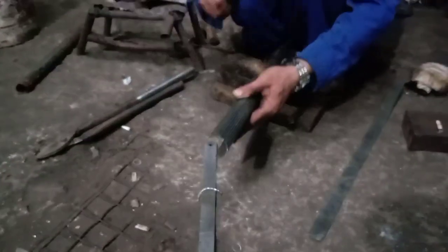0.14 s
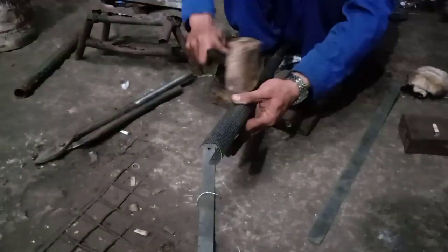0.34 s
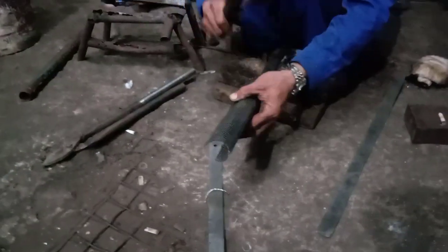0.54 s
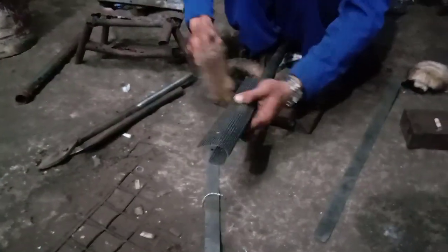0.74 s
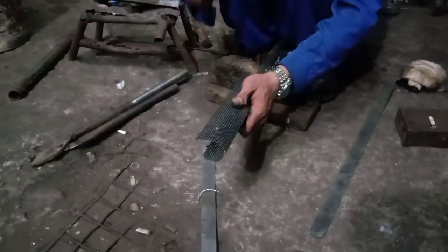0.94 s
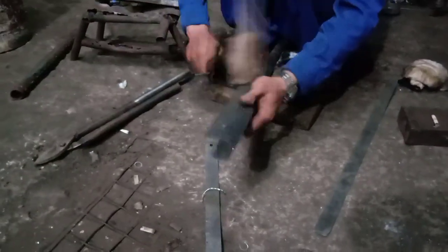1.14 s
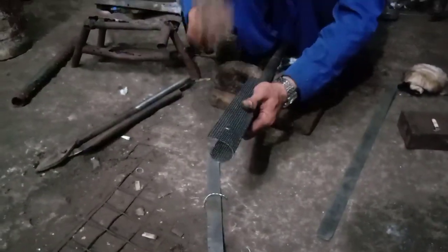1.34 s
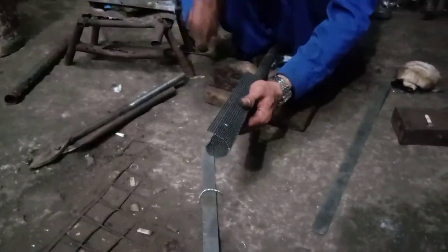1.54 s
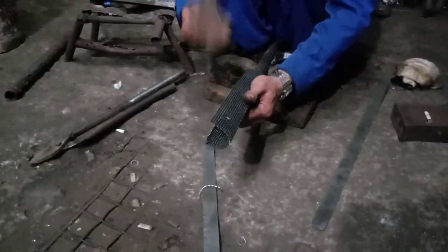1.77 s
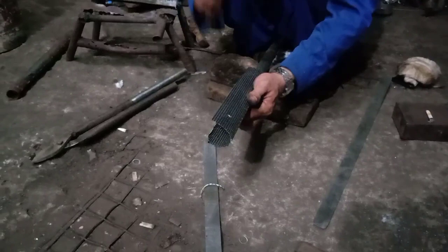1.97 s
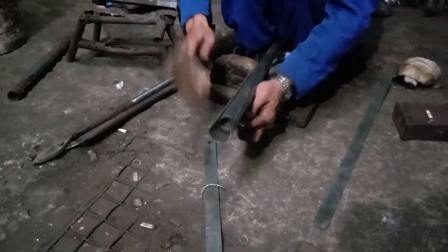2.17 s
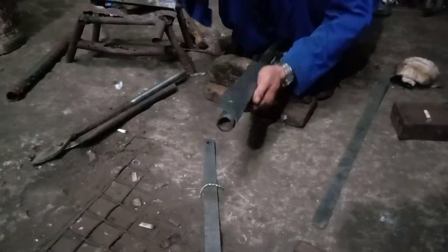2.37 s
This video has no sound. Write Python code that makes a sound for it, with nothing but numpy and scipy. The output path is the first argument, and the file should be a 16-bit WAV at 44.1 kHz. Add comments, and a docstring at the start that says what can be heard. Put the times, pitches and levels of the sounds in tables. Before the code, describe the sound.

Five loud hammer blows on a perforated steel tube resting on a block, each a hard clanking knock with rattle and brief ring; light scuffs between, low hum and hiss, small workshop, close microphones.

```python
"""Hum and hiss fill a small workshop; the sleeve swishes and a perforated steel tube scuffs on a block.
From 0.2 s a hand hammer pounds the tube five times: damped modes knock and thud, noise cracks and rattles.
After each blow the tube's modes ring, with two faint high tones, until the hand damps it; the block rocks back.
Between blows the tube is turned, with noise scuffs and decaying bumps; the last scuffs follow the fifth blow.
A limiter ducks the background around loud peaks."""
import sys
import numpy as np
from scipy import signal
from scipy.io import wavfile
from scipy.ndimage import uniform_filter1d, minimum_filter1d

SR = 44100
rng = np.random.default_rng(int(sys.argv[2]) if len(sys.argv) > 2 else 0)


def persist_wave(psi):
    """Save psi, clipped to +-1, as 16-bit WAV."""
    counts = np.round(np.clip(psi, -1, 1) * 32767).astype(np.int16)
    wavfile.write(sys.argv[1], SR, np.atleast_2d(counts).T)


N = 105840
TIME = np.arange(N) / SR
AFTER = TIME[:SR // 2]  # seconds since the start of one event

# Noise bands: third-octave edges in Hz, then pairs of band centre in Hz and its filter.
EDGES_HZ = 28 * 2 ** (np.arange(29) / 3)
BANDS = [(np.sqrt(low * high), signal.butter(2, [low, high], "band", fs=SR, output="sos"))
         for low, high in zip(EDGES_HZ, EDGES_HZ[1:])]
# Left-right correlation of diffuse sound. Each row: frequency in Hz, correlation from 0 to 1.
LIKENESS = [(80, 0.96), (300, 0.85), (700, 0.49), (1300, 0), (2200, 0), (15000, 0)]

# Echo spectrum of the room. Each row: frequency in Hz, relative level in dB.
ROOM = [(70, -6), (170, -0.5), (400, 1.5), (850, -7.5), (1600, -1.5), (2400, -3.5), (5000, -4.5),
        (13000, 1.5)]
# Reverberation of the room. Each row: frequency in Hz, time to fall 60 dB in seconds.
ROOM_T60 = [(80, 0.47), (600, 0.24), (2000, 0.21), (6000, 0.77), (14000, 0.21)]
ROOM_BUILD_S, ROOM_PAN_DB = 0.0015, -0.5  # pan is added on the left, taken off on the right
KNOCK_ROOM_DB, CRACK_ROOM_DB = -2, -1.5

# Low workshop noise. Each row: frequency in Hz, spectral density in dB against unit white noise.
HUM = [(30, -86), (55, -39), (90, -28.5), (150, -37.5), (300, -33), (700, -30.5), (1200, -36.5),
       (2100, -27), (3300, -43.5), (6000, -75)]
# Hiss spectrum, before its level curve. Each row: frequency in Hz, relative density in dB.
HISS = [(1500, 0), (3000, 5.5), (4200, -13), (5400, 12), (6500, -7.5), (7800, -8.5), (10000, -28.5),
        (12000, -12), (15000, -6)]
# Course of the hiss. Each row: time in seconds, level in dB.
HISS_LEVEL = [(0, -31.5), (.2, -31), (.38, -32.5), (.7, -40), (1.0, -36.5), (1.25, -40), (1.45, -38),
              (1.65, -41), (1.92, -33.5), (2.15, -36.5), (2.4, -35)]
HISS_PAN_DB, FLICKER_DB = -1.06, 2.5  # pan is added on the left, taken off on the right

# Swishes of sleeve and sliding tube. Each row: start in seconds, length in seconds, centre in Hz, level in dB.
SWISHES = [(0.0, 0.034, 4980, -36.5), (0.313, 0.17, 5970, -42.5), (0.481, 0.06, 5280, -38.5),
           (0.528, 0.041, 6000, -36), (1.384, 0.12, 5780, -41), (1.857, 0.099, 5800, -39),
           (2.322, 0.044, 5740, -37)]
SWISH_WIDTH_HZ = 410

# Scuffs of the turned tube on the block. Each row: start in seconds, length in seconds, level in dB.
SCUFFS = [(0.087, 0.058, -33), (0.27, 0.13, -42.5), (0.484, 0.058, -37.5), (1.373, 0.094, -36.5),
          (1.735, 0.073, -37), (1.863, 0.069, -43), (2.226, 0.079, -39), (2.323, 0.052, -29.5),
          (2.362, 0.046, -33)]
# Spectrum shared by the scuffs. Each row: frequency in Hz, relative density in dB.
SCUFF = [(150, -51), (700, 10.5), (1200, -2), (2200, 12.5), (3200, 1.5), (4200, 2), (5600, 4.5),
         (7500, -21), (10000, -8.5), (14000, -21)]
# Light bumps of tube and block.
# Each row: start in seconds, frequency in Hz, level in dB, 60 dB decay in seconds.
BUMPS = [(.10, 3610, -26, 0.082), (.115, 2215, -31, 0.16), (0.488, 251, -31.5, 0.24),
         (0.908, 106.4, -38.5, 0.13), (1.045, 3570, -34, 0.092), (1.404, 295.5, -34, 0.27),
         (1.859, 94, -38, 0.14), (2.018, 5260, -21.5, 0.077), (2.337, 260, -29.5, 0.13)]
BUMP_BUILD_S = 0.004

# Rings of the tube at the blows, and twice more where it springs back onto the block.
# Each row: start in seconds, then main, middle, upper and shimmer drive in dB,
# ring length as a factor, time until gripped in seconds.
RINGS = [(0.2107, 3, -4, 4, -4, 0.86, 0.084), (0.5679, -9.5, -16, -19, 1, 0.93, 0.09),
         (1.0708, -6.5, -1, -0.5, 1.5, 0.88, 0.18), (1.107, -7, -12, -5.5, -11, 1.46, 0.072),
         (1.5074, -15, -21, -23, -11.5, 1.9, 0.075), (1.9709, -1, -12.5, -21, -7.5, 2.04, 0.042),
         (0.305, -16.5, -27, -23, -13, 0.91, 0.044)]
# Ringing modes of the tube up to 6.9 kHz, partly in close pairs,
# with two faint, brief high tones at 10.3 and 11 kHz.
# Each row: frequency in Hz, relative level in dB, 60 dB decay in seconds before the length factor.
RING_TONES = [(2189, -10.5, 0.19), (2214, -25, 0.75), (3027, -19, 0.21), (3086, -20, 0.094),
              (3808, -23.5, 0.12), (3850, -21, 0.14), (5020, -30, 0.16), (5825, -30.5, 0.093),
              (5845, -32, 0.15), (6870, -45.5, 0.14), (10300, -39, 0.13), (11000, -41, 0.16)]
MIDDLE_FROM_HZ, UPPER_FROM_HZ, SHIMMER_FROM_HZ = 2600, 3400, 4400
RING_BUILD_S, RING_HOLD_S = 0.0023, 0.019  # the hold is stretched by the length factor
RING_WAVER, WAVERS_PER_S = .33, 15
RING_BUZZ, BUZZES_PER_S = .2, 290
RING_LAG_CYCLES = 0.26  # between the two microphones
GRIP_T60_S = 0.19  # extra damping once the hand closes

# Hammer blows. Each row: start in seconds, then low knock, high knock, clank, thud, crack and rattle in dB,
# rattle length as a factor, sizzle in dB, rocking of the block in dB.
BLOWS = [(0.2107, -1.5, 7, 4, -4, 3.5, -2.5, 1.1, -2, -29),
         (0.5679, 1, -0.5, 2, 4, -0.5, 4, 0.77, -1.5, -39),
         (1.0708, -1.5, 2, 3, -1.5, -1, -3, 1.63, -17, -30),
         (1.507, -1, 1, -7.5, -2.5, 0, 1, 1.08, -11, -27),
         (1.9704, -7, 1, -9, -1.5, -2.5, 0.5, 1.15, -1, -21)]
# Dead modes of the tube pinned under the hammer, low then high.
# Each row: frequency in Hz, relative level in dB, 60 dB decay in seconds.
LOW_KNOCK = [(655, -10.5, 0.035), (698, -8, 0.036), (750, -8.5, 0.03), (893.4, -3.5, 0.028),
             (1260, -15.5, 0.034)]
HIGH_KNOCK = [(1506, -27, 0.037), (1589, -7.5, 0.033), (1675, -7, 0.025)]
# Short modes of the clank. Each row: frequency in Hz, relative level in dB, 60 dB decay in seconds.
CLANK = [(1868, -11.5, 0.047), (1932, -7.5, 0.027), (2090, -20, 0.032), (2233, -10, 0.03),
         (2334, -22, 0.07), (2604, -17.5, 0.044), (3040, -22, 0.037)]
# Modes of the block on the floor. Each row: frequency in Hz, relative level in dB, 60 dB decay in seconds.
THUD = [(88, -28.5, 0.15), (159, -22, 0.044), (300.4, -17.5, 0.029), (502, -29, 0.072)]
CONTACT_S = 0.0005  # time constant of the impact's rise
# Crack of steel on steel. Each row: frequency in Hz, relative density in dB.
CRACK = [(200, -13.5), (1000, -7), (2300, 1), (3400, -9.5), (5600, -4), (7500, -39), (9500, -30),
         (10800, -22), (12500, -24), (15500, -34)]
CRACK_T60_S = 0.038
# Perforated wall rattling on the block. Each row: frequency in Hz, relative density in dB.
RATTLE = [(250, -23), (480, -17.5), (640, -3), (900, -18.5), (1200, 0), (1400, -21.5), (1600, -8),
          (2250, -5), (2800, -24), (3500, -36)]
RATTLE_T60_S, RATTLE_BUILD_S = 0.23, 0.0011  # the decay is before the length factor
# Bright edge of the rattle. Each row: frequency in Hz, relative density in dB.
SIZZLE = [(6000, -24), (8500, -36), (11000, -25), (15000, -28)]
SIZZLE_T60_S, SIZZLE_BUILD_S = 0.29, 0.0046
# Thump of the block rocking back to the floor.
# Each row: frequency in Hz, relative level in dB, 60 dB decay in seconds.
ROCK = [(84, -4, 0.089), (139, -2, 0.084), (178, 7, 0.019)]
ROCK_AFTER_S, ROCK_BUILD_S = 0.0299, 0.004

LOW_CUT_HZ, CUTOFF_HZ = 64, 15500
LIMIT_DB, RELEASE_DB_PER_S, LOOK_AHEAD_S = 1, 65, .018
CLIP_LEVEL = 1.2


def from_db(db):
    """Logarithmic level: decibels become an amplitude ratio."""
    return 10 ** (np.asarray(db) / 20)


def at_hz(points, hz):
    """Logarithmic pitch scale: a curve is interpolated linearly in log frequency."""
    f, value = np.transpose(points)
    return np.interp(np.log(hz), np.log(f), value)


def add(out, s, sound):
    """Superposition: a sound is summed into the mix at its start time."""
    i = int(max(s, 0) * SR)
    out[:, i:i + sound.shape[-1]] += sound[..., :N - i]


def drift(rate, t):
    """Low-pass random process: noise smoothed above a rate in Hz, with a spread near one."""
    step = 40  # samples between the values computed
    pole = np.exp(-2 * np.pi * step * rate / SR)
    white = rng.standard_normal(len(t) // step + 2002)
    slow = signal.lfilter([1], [1, -2 * pole, pole * pole], white)[2000:]  # drop the settling
    return np.interp(np.arange(len(t)) / step, np.arange(len(slow)), slow / slow.std())


def noise(spectrum, t, envelope=lambda hz: 1):
    """Diffuse noise: each third octave has its own level, envelope and left-right correlation."""
    white = rng.standard_normal((2, 2, len(t) + SR // 10))
    mid, side = 0, 0
    for k, (hz, sos) in enumerate(BANDS):
        if spectrum[0][0] / 2 < hz < spectrum[-1][0] * 2:
            # neighbouring bands take turns between two independent sources
            band = signal.sosfilt(sos, white[k % 2])[:, -len(t):] * envelope(hz)
            gain = from_db(at_hz(spectrum, hz))
            alike = np.clip(at_hz(LIKENESS, hz), -1, 1)
            mid += gain * np.sqrt((1 + alike) / 2) * band[0]
            side += gain * np.sqrt((1 - alike) / 2) * band[1]
    return np.array([mid + side, mid - side])


def decay(t60):
    """Exponential damping: amplitude falls 60 dB in t60 seconds."""
    return np.exp(-np.log(1000) * AFTER / t60)


def swell(build_s, t60):
    """Build-up and damping: an exponential rise leads into an exponential decay."""
    return (1 - np.exp(-AFTER / build_s)) * decay(t60)


def struck(modes, scatter_db=1, detune=0.001):
    """Modal excitation: damped sines whose levels and pitches vary a little from strike to strike."""
    out = 0
    for k, (hz, db, t60) in enumerate(modes):
        gain = from_db(db + scatter_db * rng.normal()) * (-1) ** k
        tuned_hz = hz * (1 + detune * rng.normal())
        out = out + gain * swell(CONTACT_S, t60) * np.sin(2 * np.pi * tuned_hz * AFTER)
    return out


def workshop(sound, wet_db):
    """Reverberation: convolution with dense noise echoes, each band dying at its own rate."""
    def tail(hz):
        shape = swell(ROOM_BUILD_S, at_hz(ROOM_T60, hz))
        return shape / np.sqrt(np.sum(shape ** 2))
    response = noise(ROOM, AFTER, tail)
    echoes = signal.fftconvolve(np.atleast_2d(sound), response, axes=-1)[:, :len(AFTER)]
    return sound + from_db([[wet_db + ROOM_PAN_DB], [wet_db - ROOM_PAN_DB]]) * echoes


def grip(after_s):
    """Added damping: the hand closes on the tube and the sound dies faster."""
    return np.exp(-np.log(1000) * np.maximum(AFTER - after_s, 0) / GRIP_T60_S)


def background(flickers_per_s=10):
    """Stationary noise, randomly modulated: low workshop hum, and a hiss that leans to the right."""
    def flicker(hz):
        return from_db(FLICKER_DB * drift(flickers_per_s, TIME))
    level_db = np.interp(TIME, *np.transpose(HISS_LEVEL))
    hiss = noise(HISS, TIME, flicker) * from_db([level_db + HISS_PAN_DB, level_db - HISS_PAN_DB])
    return noise(HUM, TIME, flicker) + hiss


def swishes(rough_db=1.5, catches_per_s=50):
    """Friction noise: narrow, high bands swell and fade as sleeve and tube move."""
    out = np.zeros((2, N))
    for s, length, hz, db in SWISHES:
        edges_hz = [hz - SWISH_WIDTH_HZ / 2, hz + SWISH_WIDTH_HZ / 2]
        band = signal.butter(2, edges_hz, "band", fs=SR, output="sos")
        rustle = signal.sosfilt(band, rng.standard_normal((2, len(AFTER))))
        shape = np.sqrt(np.abs(np.sin(np.pi * np.minimum(AFTER / length, 1))))
        add(out, s, from_db(db) * shape * rustle / rustle.std())
    return out * from_db(rough_db * drift(catches_per_s, TIME))


def handling(rough_db=2.5, catches_per_s=90):
    """Friction and light impact: turning the tube makes rough noise scuffs and damped sine bumps."""
    out = np.zeros((2, N))
    for s, length, db in SCUFFS:
        out += from_db(db) * np.sqrt(np.abs(np.sin(np.pi * np.clip((TIME - s) / length, 0, 1))))
    out *= noise(SCUFF, TIME) * from_db(rough_db * drift(catches_per_s, TIME))
    for s, hz, db, t60 in BUMPS:
        add(out, s, from_db(db) * swell(BUMP_BUILD_S, t60) * np.sin(2 * np.pi * hz * AFTER))
    return out


def tube_ring(drives_db, length):
    """Modulated decaying tones: the tube buzzes on the block, and echoes interfere at each microphone."""
    def wobble(rate):
        return drift(rate, AFTER) + 1j * drift(rate, AFTER)
    out = np.zeros((2, len(AFTER)))
    for hz, db, t60 in RING_TONES:
        drive_db = drives_db[np.searchsorted([MIDDLE_FROM_HZ, UPPER_FROM_HZ, SHIMMER_FROM_HZ], hz)]
        rise = np.minimum(AFTER / RING_BUILD_S, 1)
        fall = np.exp(-np.log(1000) * np.maximum(AFTER / length - RING_HOLD_S, 0) / t60)
        tone = rise * fall * np.exp(2j * np.pi * (hz * AFTER + rng.random()))
        for channel in range(2):
            waver = 1 + RING_WAVER * wobble(WAVERS_PER_S) + RING_BUZZ * wobble(BUZZES_PER_S)
            heard = np.real(tone * waver * np.exp(2j * np.pi * channel * RING_LAG_CYCLES))
            # the wavering keeps the energy of the steady tone
            same_energy = np.sqrt(np.sum(tone.real ** 2) / np.sum(heard ** 2))
            out[channel] += from_db(db + drive_db) * same_energy * heard
    return out


def tube():
    """Ringing, then added damping: each ring runs until the hand closes on the tube."""
    out = np.zeros((2, N))
    for s, *drives_db, length, gripped_s in RINGS:
        add(out, s, tube_ring(drives_db, length) * grip(gripped_s))
    return out


def hammer(rattle_free_s=0.092):
    """Impact: knock, thud and crack excite the room, the wall rattles, and the block rocks back."""
    out = np.zeros((2, N))
    rock = sum(from_db(db) * swell(ROCK_BUILD_S, t60) * np.sin(2 * np.pi * hz * AFTER)
               for hz, db, t60 in ROCK)
    for (s, low_db, high_db, clank_db, thud_db, crack_db,
         rattle_db, rattle_length, sizzle_db, rock_db) in BLOWS:
        knock = sum(from_db(db) * struck(modes) for db, modes in
                    ((low_db, LOW_KNOCK), (high_db, HIGH_KNOCK), (clank_db, CLANK), (thud_db, THUD)))
        crack = from_db(crack_db) * noise(CRACK, AFTER) * swell(CONTACT_S, CRACK_T60_S)
        rattle = from_db(rattle_db) * noise(RATTLE, AFTER)
        rattle *= swell(RATTLE_BUILD_S, RATTLE_T60_S * rattle_length) * grip(rattle_free_s * rattle_length)
        sizzle = from_db(sizzle_db) * noise(SIZZLE, AFTER)
        sizzle *= swell(SIZZLE_BUILD_S, SIZZLE_T60_S) * grip(rattle_free_s)
        add(out, s, workshop(knock, KNOCK_ROOM_DB) + workshop(crack, CRACK_ROOM_DB) + rattle + sizzle)
        add(out, s + ROCK_AFTER_S, from_db(rock_db) * rock)
    return out


def scene():
    """Superposition: background, swishes, handling, ringing tube and hammer blows add together."""
    return background() + swishes() + handling() + tube() + hammer()


def record(dry):
    """Band limiting and compression: bass cut, look-ahead limiter, rounded peaks, treble cut."""
    dry = signal.sosfilt(signal.butter(3, LOW_CUT_HZ, "high", fs=SR, output="sos"), dry)
    level_db = 20 * np.log10(np.abs(dry).max(axis=0) + 1e-9)
    over_db = np.maximum(level_db - LIMIT_DB, 0)
    # the reduction jumps up at once and recovers at a constant rate
    release_db = RELEASE_DB_PER_S * TIME
    held_db = np.maximum.accumulate(over_db + release_db) - release_db
    # widened both ways, so that it begins before the peak, then smoothed
    ahead_db = minimum_filter1d(-held_db, 2 * int(LOOK_AHEAD_S * SR) + 1)
    gain_db = uniform_filter1d(ahead_db, size=220)
    limited = CLIP_LEVEL * np.tanh(dry * from_db(gain_db) / CLIP_LEVEL)
    return signal.sosfilt(signal.ellip(10, .1, 70, CUTOFF_HZ, fs=SR, output="sos"), limited)


dry = scene()
out = record(dry)
persist_wave(out)
```